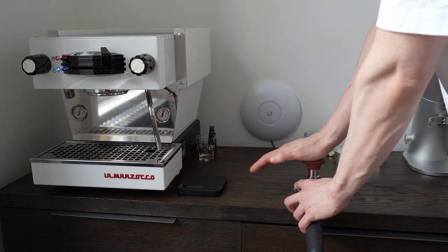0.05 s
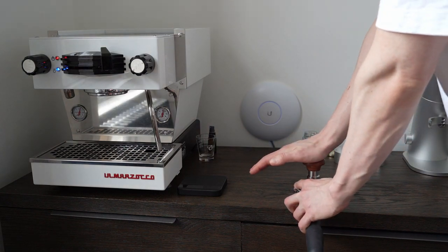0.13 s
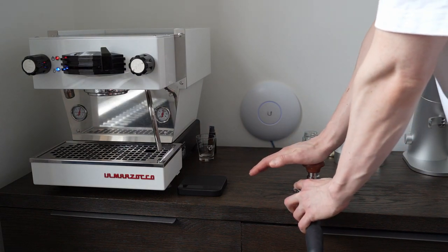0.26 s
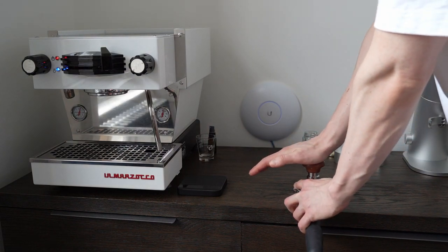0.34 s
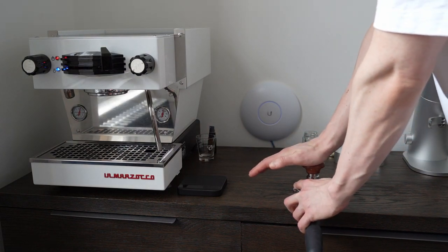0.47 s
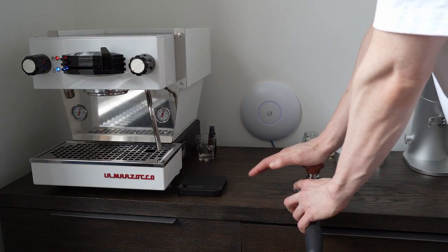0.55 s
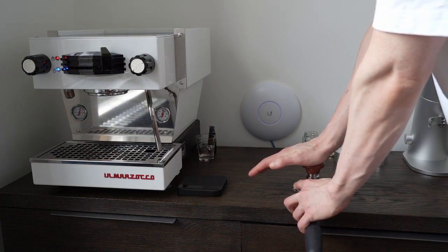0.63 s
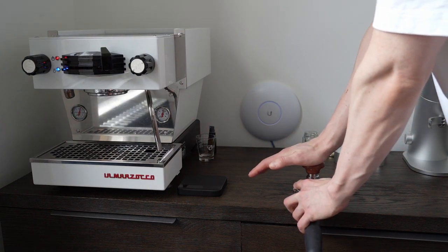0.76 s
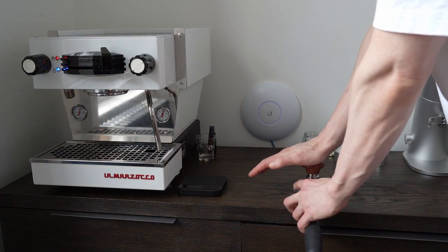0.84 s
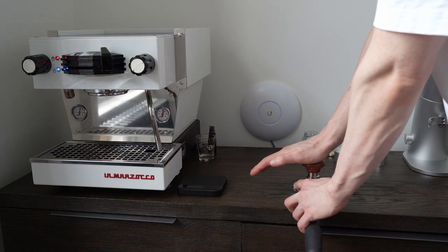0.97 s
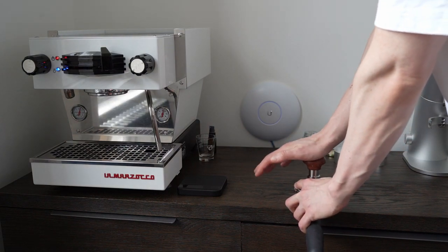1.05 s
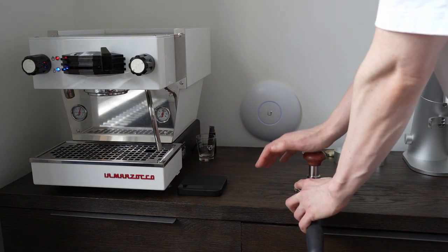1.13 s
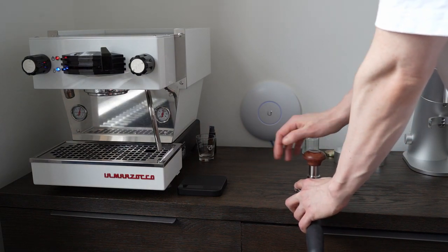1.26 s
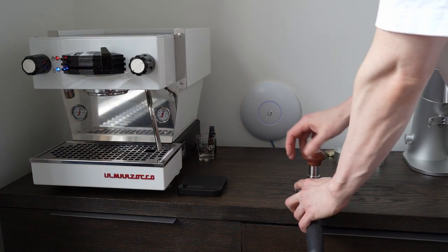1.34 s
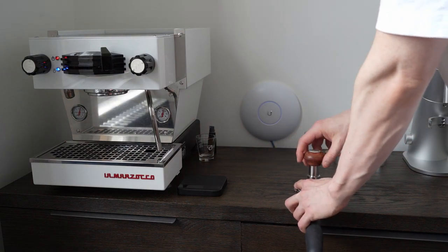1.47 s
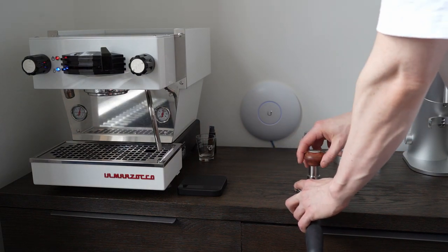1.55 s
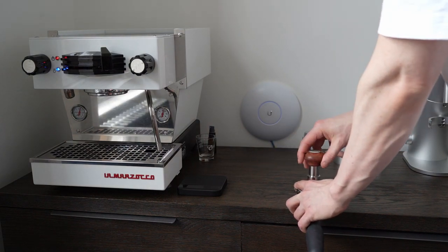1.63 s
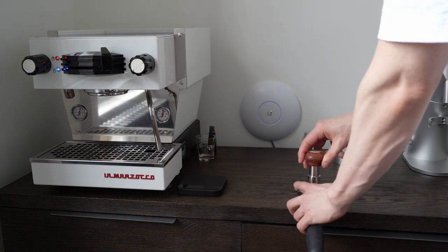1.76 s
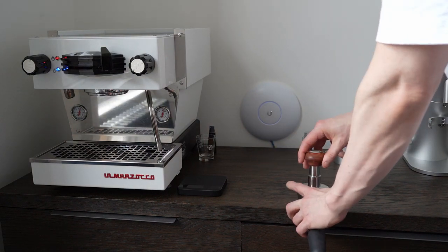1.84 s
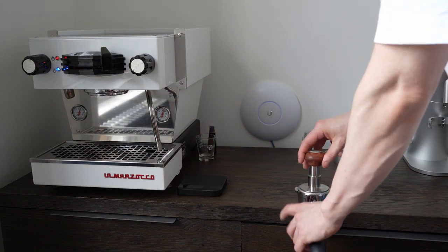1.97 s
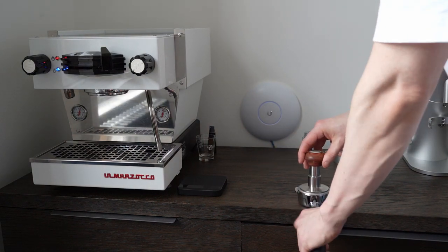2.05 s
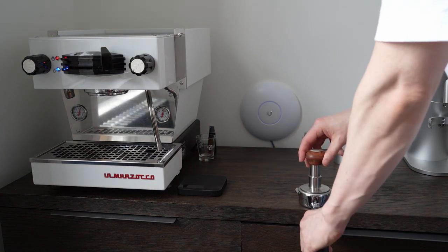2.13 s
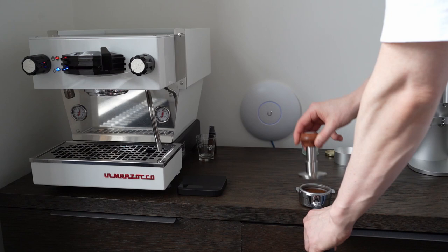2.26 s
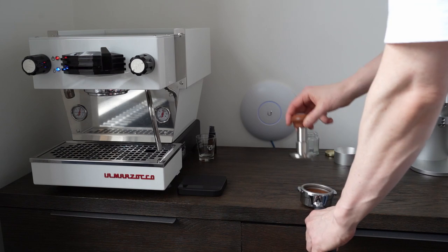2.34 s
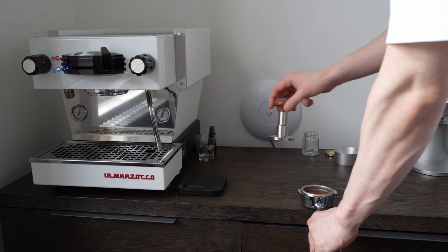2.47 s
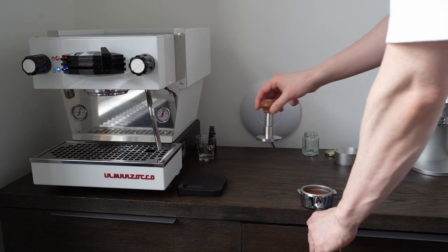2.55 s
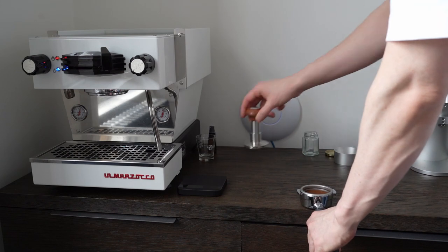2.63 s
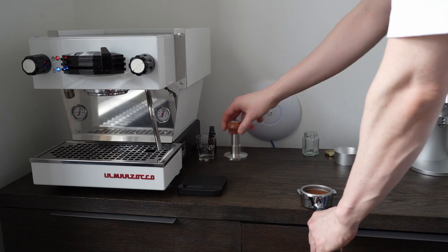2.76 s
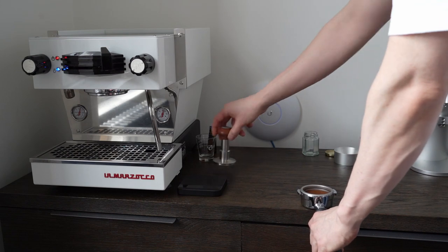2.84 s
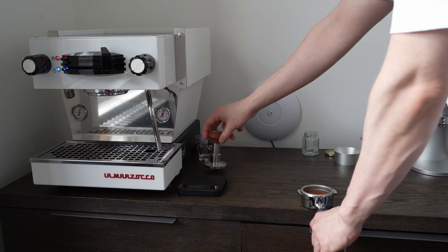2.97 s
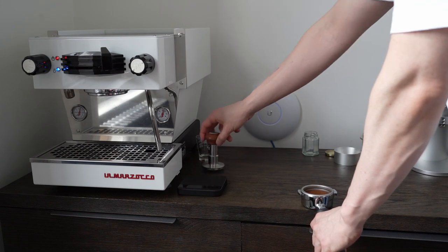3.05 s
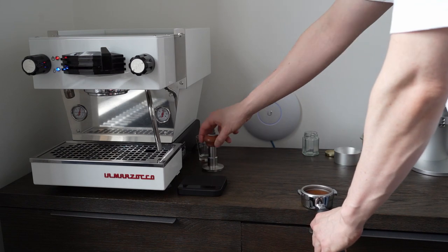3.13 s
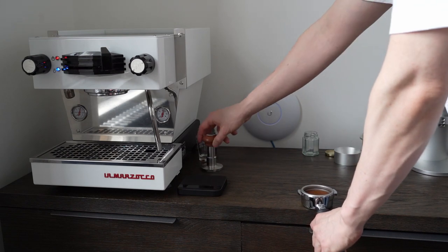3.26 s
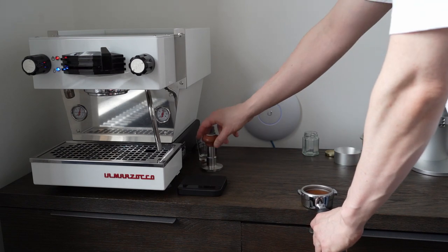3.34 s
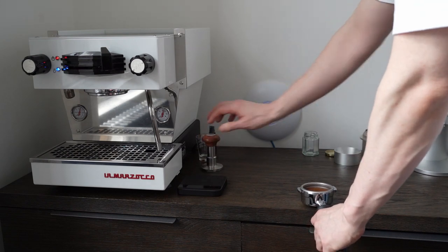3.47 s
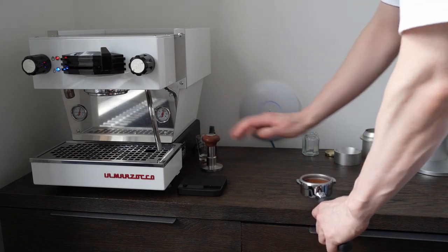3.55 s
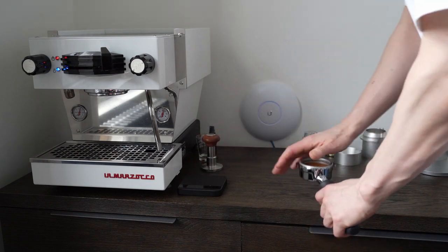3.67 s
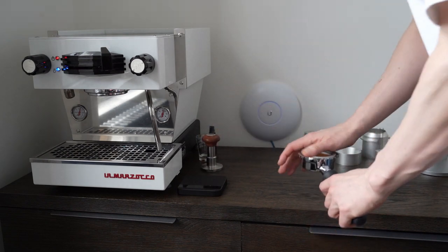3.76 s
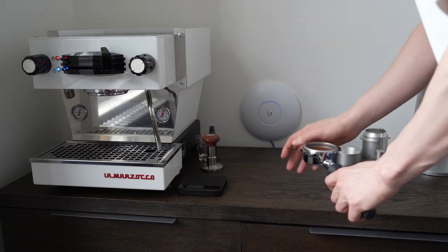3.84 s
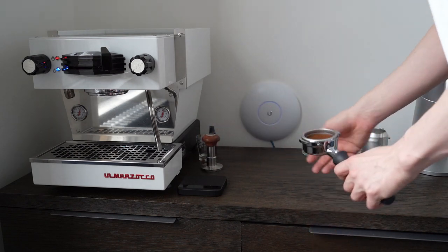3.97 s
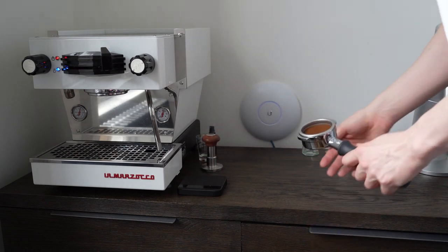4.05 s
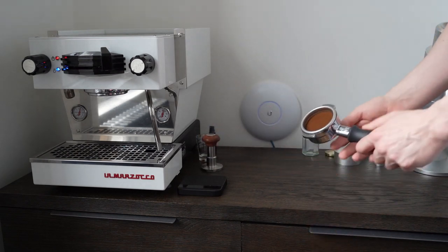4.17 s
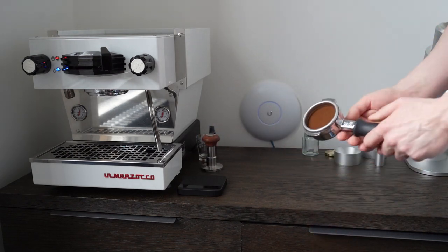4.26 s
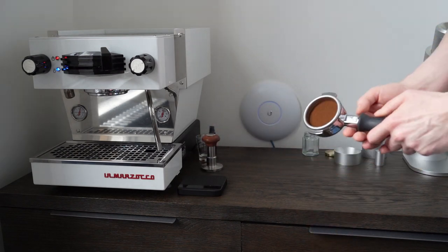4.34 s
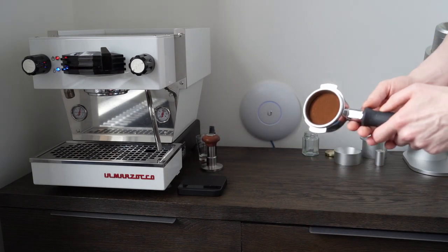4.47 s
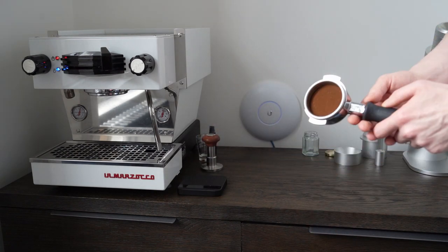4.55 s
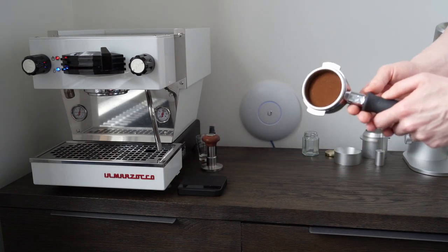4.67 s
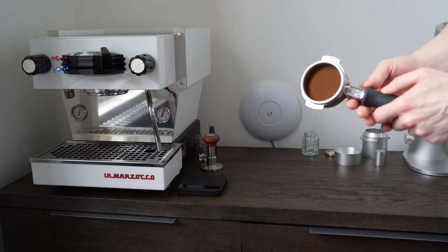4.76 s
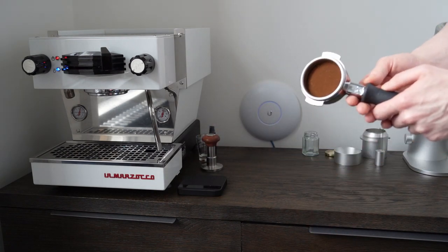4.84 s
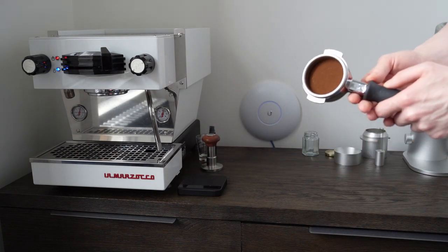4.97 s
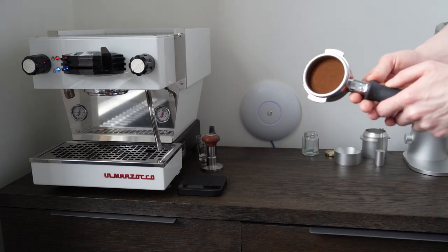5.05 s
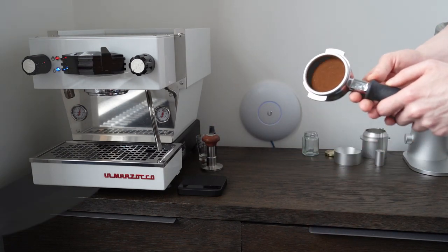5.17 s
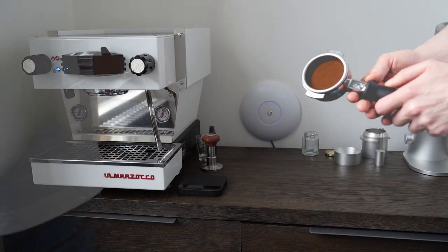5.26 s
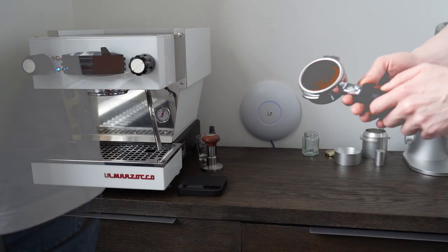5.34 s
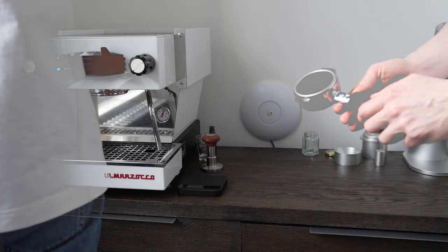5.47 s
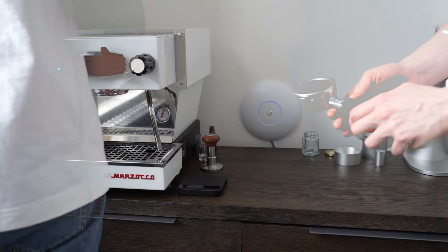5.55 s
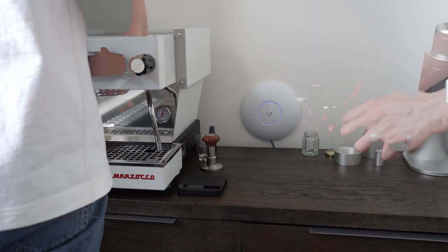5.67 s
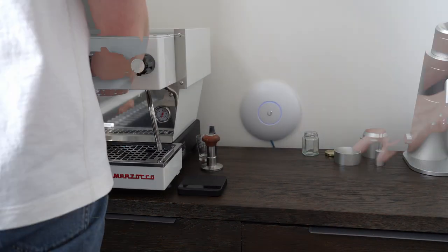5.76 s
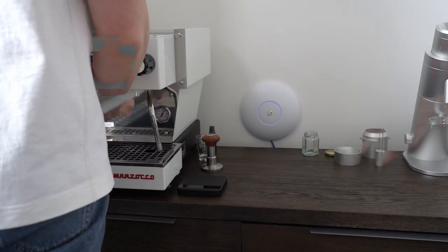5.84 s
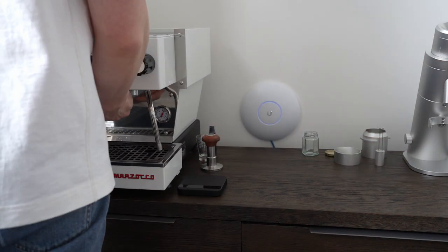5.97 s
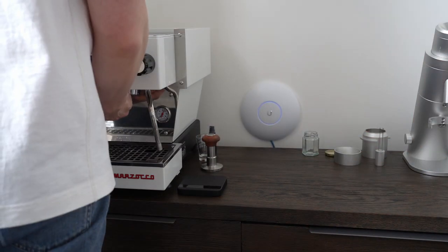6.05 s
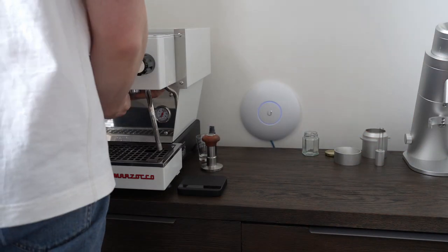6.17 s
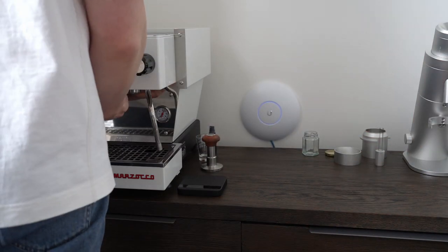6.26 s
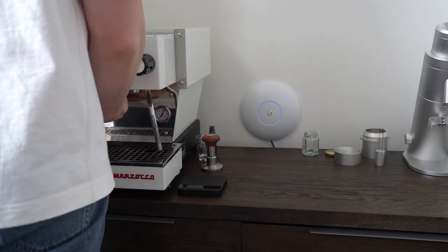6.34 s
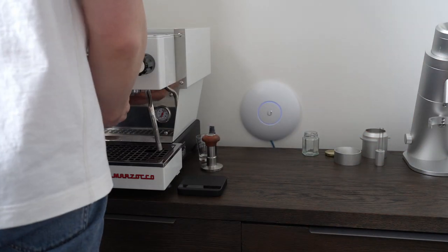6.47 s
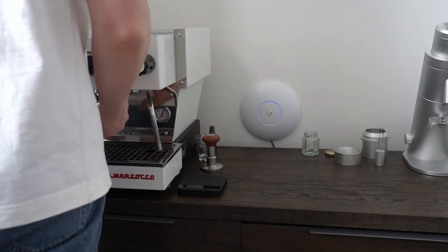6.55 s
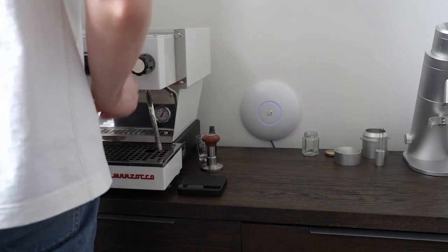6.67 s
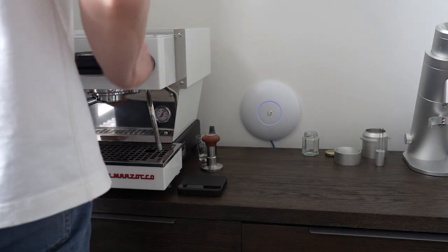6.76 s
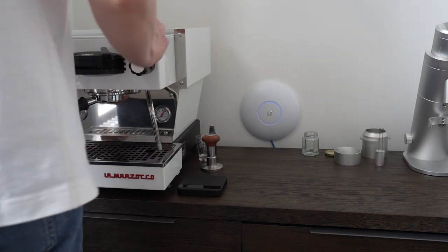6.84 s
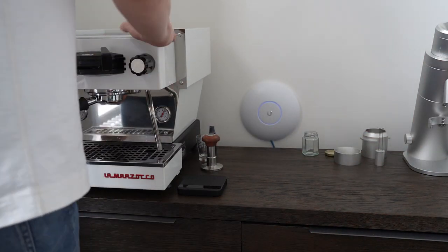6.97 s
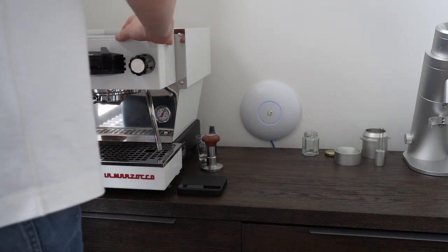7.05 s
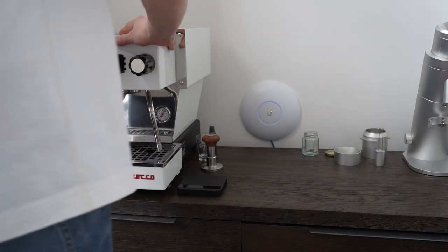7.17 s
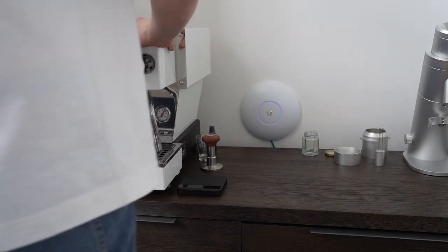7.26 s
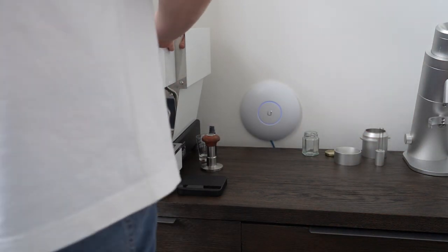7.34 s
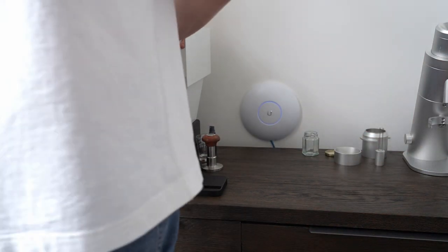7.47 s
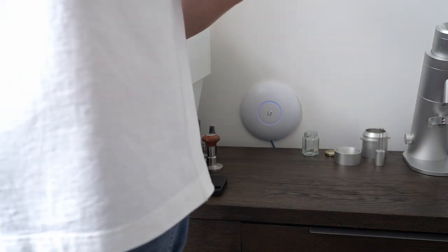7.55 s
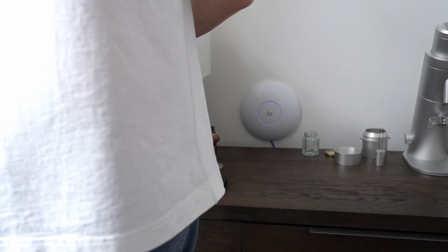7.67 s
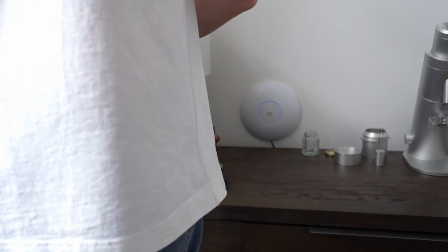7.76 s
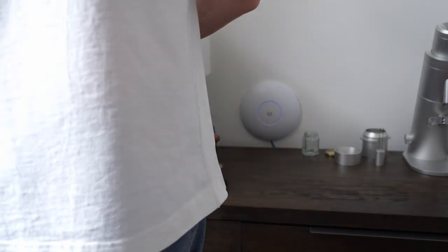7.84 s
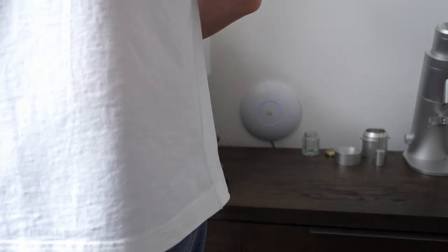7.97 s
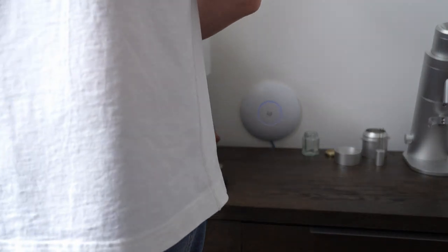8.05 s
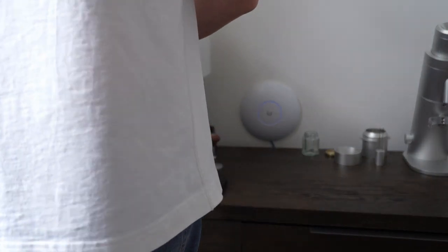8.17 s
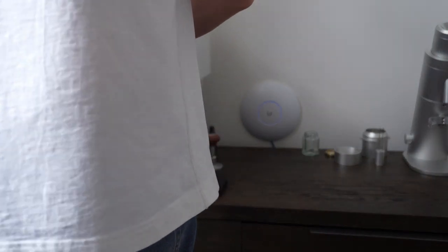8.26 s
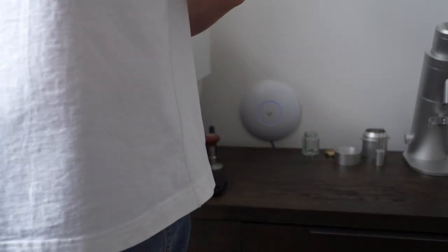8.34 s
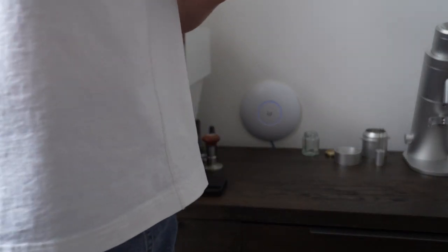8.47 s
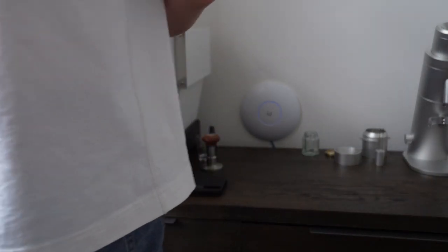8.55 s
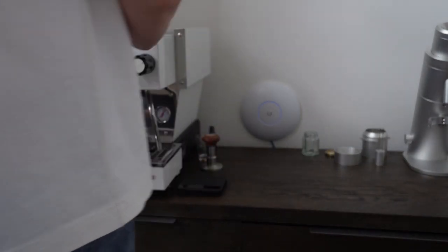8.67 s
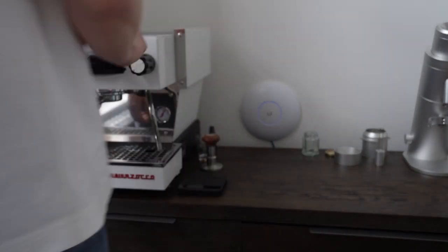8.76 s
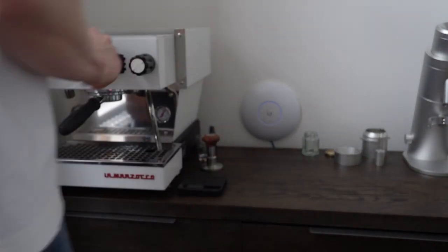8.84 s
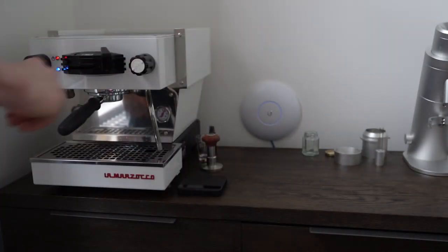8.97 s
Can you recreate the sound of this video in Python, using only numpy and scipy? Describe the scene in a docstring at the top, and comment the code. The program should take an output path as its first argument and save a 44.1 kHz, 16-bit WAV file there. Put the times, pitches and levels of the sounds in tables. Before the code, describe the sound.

A steel coffee filter handle squeals and scrapes across a hollow wooden counter, knocks hard, then later clanks into a metal machine in an echoey kitchen.

```python
"""A steel coffee filter handle is dragged over a hollow wooden counter, its base squealing, then knocked and
tamped as the top rocks. The tamper is set on its stand; the handle clanks into a machine, whose body hums low,
and a seat creaks. Hands and feet shuffle at times, over steady hum and hiss. Contacts are noise bursts, wood
and steel are decaying modes, friction is random catches. A large bare kitchen draws a long tail after the
drags, knocks and clanks; the soft low notes and floor booms stay dry."""
import sys
import numpy as np
from scipy import signal
from scipy.fft import rfft, irfft, next_fast_len
from scipy.io import wavfile
from scipy.ndimage import map_coordinates

SR = 44100
rng = np.random.default_rng(int(sys.argv[2]) if len(sys.argv) > 2 else 0)


def dump_mix(stems):
    """Bounce the given channels to the path in sys.argv[1] as a 16-bit WAV at rate SR."""
    frames = np.atleast_2d(stems).T  # one column per channel
    limited = np.clip(frames, -1, 1)  # hard clip at full scale
    pcm = np.round(limited * 32767).astype(np.int16)
    wavfile.write(sys.argv[1], SR, pcm)


N = 397341
TIME_S = np.arange(N) / SR

# Steady hum and hiss. Each row: frequency in Hz, relative level per Hz in dB.
FLOOR_SPECTRUM_DB = [(15, -32), (25, -5), (55, 0), (173, -3.5), (289, 1.5), (421, -10), (631, -6.5),
                     (741, -11), (997, -11.5), (2230, -18.5), (2920, -36), (3170, -22.5), (3930, -26.5),
                     (15500, -29.5)]
FLOOR_RMS_DB = -53.5
# Treble of the hiss sinks and returns. Each row: time in seconds, relative level in dB.
HISS_SWAY_DB = [(0, 6), (1.8, -4), (2.3, 1.5), (2.85, 2.5), (4.5, 2), (5.3, 0.5), (9, 1.5)]
HISS_FROM_HZ = 2000
# Likeness of the two channels. Each row: frequency in Hz, correlation from 0 to 1.
LIKENESS = [(40, .97), (125, .99), (250, .97), (500, .8), (1000, .55), (2000, .35), (5000, 0), (15000, 0)]
# Things dragged and feet shuffled on wood, one stroke a row. Each row: start, rise, hold and fall in seconds,
# then rumble, hollow, rasp and steel basket levels in dB.
DRAGS = [(0, 0.0018, 0.087, 0.14, -42.5, -34, -35.5, -40.5),
         (.09, 0.026, 0.13, 0.16, -44, -39.5, -36.5, -39.5),
         (.46, 0.014, 0.16, 0.36, -31.5, -26.5, -33, -32), (.92, 0.078, .03, 0.21, -50, -51, -47, -45),
         (1.07, .05, 0.038, 0.14, -47, -45.5, -41.5, -66),
         (1.595, 0.012, 0.016, 0.24, -41.5, -53, -57.5, -61),
         (2.1, 0.021, 0.016, .4, -34.5, -43.5, -43, -64), (2.165, 0.0068, 0.024, 0.072, -56, -68, -70, -36),
         (2.5, 0.063, 0.086, 0.32, -47, -58, -70, -78), (4.43, 0.071, 0.1, 0.18, -53.5, -51, -53.5, -60.5),
         (5.05, 0.057, 0.022, 0.19, -48.5, -51.5, -55.5, -75),
         (5.2, 0.016, 0.018, 0.084, -58, -62, -60, -63), (5.47, 0.01, 0.33, 0.11, -49, -56, -59, -51),
         (5.905, 0.008, .06, 0.19, -36, -35.5, -48, -47), (6.0, 0.045, 0.091, 0.34, -39, -41, -45, -40),
         (6.35, 0.031, 0.084, 0.39, -47.5, -45.5, -47.5, -45.5),
         (6.84, 0.11, 0.34, .15, -63, -62, -56, -55), (7.98, 0.045, 0.09, .3, -58, -71, -86, -89),
         (8.32, 0.0088, 0.013, 0.2, -60, -68, -53, -69), (8.6, 0.082, 0.3, .2, -57, -63, -62, -66)]
# Skin, cloth and coffee grit sliding. Each row: start, rise, hold and fall in seconds, hiss and top in dB.
SLIDES = [(0, .005, 0.091, .1, -73, -67), (.08, 0.011, .01, 0.097, -51, -46),
          (.15, 0.02, 0.037, 0.087, -66, -48), (.255, 0.0083, 0.0086, 0.05, -59, -51.5),
          (.458, 0.0057, 0.084, 0.15, -44, -32.5), (.93, 0.013, 0.0067, 0.019, -33, -34.5),
          (1.05, 0.048, 0.018, 0.053, -38, -44), (2.16, 0.026, 0.012, 0.091, -46, -34),
          (3.76, 0.036, 0.055, .15, -72, -62.5), (4.45, 0.04, 0.11, .4, -62, -72),
          (5.07, .02, 0.053, .2, -70, -79), (5.47, .02, 0.17, .25, -51.5, -62),
          (5.905, 0.0035, 0.042, 0.15, -41.5, -58), (6.95, 0.064, .13, .2, -38, -40.5),
          (8.33, .02, .15, .2, -60.5, -63.5), (8.45, 0.18, .12, 0.95, -58, -59)]
# Floorboards under shifting weight. Each row: start, rise, hold and fall in seconds, boom level in dB.
WEIGHT = [(.2, 0.083, .01, 0.17, -45), (.46, 0.012, 0.018, .25, -29), (.6, 0.026, .01, .2, -40),
          (1.12, 0.068, .02, 0.21, -44.5), (5.5, .05, .1, .3, -52.5), (5.84, 0.064, .05, 0.26, -43.5),
          (5.95, 0.18, .12, 0.28, -33.5), (6.38, 0.071, 0.23, 0.41, -48), (2.08, 0.014, 0.043, 0.18, -46),
          (4.46, 0.046, .1, 0.38, -62), (7.98, 0.062, 0.078, 0.34, -52), (8.7, 0.052, 0.071, 0.15, -55)]
FALL_DB = 30  # lost by a stroke in its fall length
# Grip on the basket, which favours some modes. Each row: time in seconds, favoured pitch in Hz.
GRIP_HZ = [(0, 2200), (.43, 2300), (.46, 1700), (1.04, 1700), (1.16, 3200), (1.6, 2000), (2.16, 1750),
           (2.25, 2050), (5.4, 2300), (5.95, 2700), (6.3, 2700), (6.5, 3300), (6.9, 2300), (9, 2300)]
GRIP_FALLOFF_DB_PER_OCTAVE = 20
# Dragged base singing on the varnish. Each row: time in seconds, pitch in Hz, level in dB.
SQUEAL = [(0, 420, -34), (.08, 445, -33), (.17, 460, -33), (.21, 505, -32), (.26, 545, -30), (.3, 545, -33),
          (.4, 535, -50), (.5, 535, -90)]
# Blows on the counter. Each row: time in seconds, crack, thud, wood ring and clack levels in dB,
# clack centre in Hz.
KNOCKS = [(0.0467, -66, -35.5, -35, -31, 970), (0.4559, -18.5, -18.5, -20, -17.5, 1470),
          (0.4905, -50, -19.5, -43, -13, 656), (0.5175, -40, -27, -26, -21, 1560),
          (0.5697, -37, -38, -15.5, -20, 654), (0.6291, -51, -39, -43, -27, 1606),
          (0.9433, -44, -43, -31, -25.5, 830), (0.9588, -38, -39, -43, -33, 740),
          (1.156, -23, -39, -37, -27, 1140), (1.1694, -47, -36, -50, -50, 1430),
          (1.6173, -78, -46.5, -53, -62, 1500), (2.107, -67, -32, -33, -37, 790),
          (2.569, -72, -35, -45, -43.5, 760), (3.1635, -32, -33, -32.5, -29.5, 1070),
          (5.0659, -69, -46, -75, -52, 810), (7.525, -37, -52, -51, -32, 1040),
          (8.325, -56, -40, -39.5, -45, 620), (8.526, -40, -54, -57, -44, 999)]
KNOCK_CRACK_S, KNOCK_CLACK_S = 0.0021, 0.0073  # decay constants
# Counter top rocking on its frame, and the machine body humming low near 250 Hz.
# Each row: time in seconds, level in dB, pitch in Hz.
LOW_NOTES = [(0.494, -12, 182.4), (0.571, -11.5, 191), (0.658, -27, 190), (0.73, -27, 202),
             (0.981, -34.5, 182), (1.19, -31.5, 178), (1.271, -35, 198), (1.652, -40, 184),
             (1.728, -42, 191), (1.825, -34.5, 185), (1.895, -39, 194), (2.139, -29.5, 177),
             (2.203, -37, 197), (2.252, -29, 187.4), (2.288, -34, 183), (2.4, -36, 194),
             (2.509, -31.5, 191), (2.593, -28, 189), (2.667, -28, 196), (2.739, -46, 192),
             (2.831, -45, 190), (3.182, -36, 151), (3.221, -36, 201), (3.277, -37, 173), (3.331, -49, 197),
             (5.651, -38, 248), (5.708, -36.5, 246), (5.774, -37, 247), (7.107, -48, 245),
             (7.158, -43, 216), (8.324, -41, 177)]
LOW_NOTE_S, LOW_NOTE_LEAD_S = 0.06, 0.01203  # note length; start ahead of the listed time
# Tamper touching steel. Each row: time in seconds, crack and ring levels in dB, favoured pitch in Hz.
CLINKS = [(1.085, -44, -30, 1420), (1.09, -46, -41, 3450), (1.128, -40, -36, 8000), (1.157, -34, -31, 2160),
          (2.165, -46, -36, 1800), (2.18, -36, -36, 2160), (2.183, -40, -44, 7000)]
# Tamper set on its stand. Each row: time in seconds, ring level in dB.
SET_DOWN = [(3.1632, -39)]
# Handle striking the machine's socket, one blow with its close echo (5.9943 s). Each row: time in seconds,
# crack, thud, ring and clack levels in dB, clack centre in Hz.
CLANKS = [(5.4561, -33, -43, -37.5, -30.5, 2550), (5.7858, -41, -45, -44, -37.5, 2700),
          (5.904, -27.5, -39, -32.5, -27.5, 1540), (5.9806, -18, -30.5, -35, -20.5, 2510),
          (5.9943, -49, -38.5, -41, -31, 2390), (6.0602, -26, -32.5, -28, -25, 2590),
          (6.2287, -50, -46, -32.5, -54, 930), (6.3683, -38, -43, -41, -30, 2360),
          (6.4161, -44, -47, -36, -38, 2740), (6.4724, -31, -52, -38, -25, 3460)]
CLANK_CRACK_S, CLANK_CLACK_S = 0.0072, 0.0094  # decay constants
# Gasket seat creaking as the handle turns. Each row: time in seconds, level in dB.
CREAKS = [(6.235, -43), (6.378, -45), (6.481, -45), (6.55, -49)]
CREAK_HZ = 880
# Modes of the resonant bodies. Each row: frequency in Hz, relative level in dB, 60 dB decay in seconds.
COUNTER_MODES = [(91.7, -8, 0.14), (136.4, -4.5, 0.16), (173.3, -3, 0.19), (195.8, -0.5, 0.13),
                 (260, -1.5, 0.053), (317, -5, 0.11), (349, -0.5, 0.041), (454, 3, 0.031),
                 (549, -3.5, 0.057), (660, -4, 0.015), (842, -11, 0.05), (954, -26, 0.02),
                 (1490, -17, 0.024)]
BASKET_MODES = [(1700, 1, .06), (2020, 0, .04), (2190, -4, .04), (2680, -3, .03), (3280, -6, .04)]
TAMPER_MODES = [(1421, 1, .05), (2159, -2, .3), (3025, -4, .12), (3500, 0, .15), (6525, 5, .3),
                (8720, -6, .15), (10880, 4, .15)]
STAND_MODES = [(5965, -8, .1), (9076, -6, .1), (13500, 0, .08)]
MACHINE_MODES = [(86, -3, .25), (250, -3, .1), (307, 0, .1), (479, 1, .09), (880, 0, .1), (1380, 2, .13),
                 (1674, -5, .04), (2132, -3, .04), (2500, 0, .04), (2800, 0, .04), (3300, -2, .04),
                 (3550, -1, .05), (3850, -3, .04)]
# Where the hands work, as the delay of the left channel. Each row: time in seconds, lag in samples.
LEFT_LAG_SAMPLES = [(0, 5), (4.9, 4.5), (5.4, -1.5), (7.3, -1), (8, -4.5), (9, 0.5)]
# Decay of the kitchen. Each row: frequency in Hz, 60 dB decay in seconds.
ROOM_T60_S = [(60, 0.38), (250, 0.98), (1000, 0.97), (3000, 1.007), (7000, 0.87), (15000, 0.11)]
# Colour of the kitchen. Each row: frequency in Hz, relative level in dB.
ROOM_COLOUR_DB = [(60, -10.5), (250, 3), (1000, 1.7), (4000, 0.5), (15000, 0)]
ROOM_DB, ROOM_RISE_S, EARLY_DB = -3, 0.0098, -13.5
CUTOFF_HZ = 16200


def from_db(db):
    """Decibels to gain."""
    return 10 ** (np.asarray(db) / 20)


def rms_one(x):
    """Scale to unit rms."""
    return x / np.sqrt(np.mean(x ** 2) + 1e-20)


def at_hz(points, hz):
    """Read a table on a log-frequency axis."""
    points_hz, values = np.transpose(points)
    return np.interp(np.log(hz), np.log(points_hz), values)


def band(x, low_hz, high_hz):
    """Band-pass."""
    edges_hz = [low_hz, min(high_hz, .45 * SR)]
    return signal.sosfilt(signal.butter(2, edges_hz, "band", fs=SR, output="sos"), x)


def strokes(table):
    """Every stroke swells, holds and dies away; one gain over time for each level column."""
    gains = 0
    for start_s, rise_s, hold_s, fall_s, *levels_db in table:
        t = TIME_S - start_s
        swell = np.clip(t / max(rise_s, .001), 0, 1) ** 2
        falls = np.clip((t - rise_s - hold_s) / max(fall_s, .01), 0, 5)
        gains = gains + np.outer(from_db(levels_db), swell * from_db(-FALL_DB * falls))
    return gains


def ring(force, hz, t60_s):
    """One mode as a two-pole resonator: a unit click sets a decaying sine of height 1 ringing."""
    r, w = from_db(-60 / (t60_s * SR)), 2 * np.pi * hz / SR
    return signal.lfilter([0, np.sin(w)], [1, -2 * r * np.cos(w), r * r], force + 1e-18)


def strike(times_s, low_db, high_db, modes, split_hz=450, spread_db=4.5, favoured_hz=None, falloff_db=0):
    """Blows ring each mode with random strength; above the split, modes off the favoured pitch get less."""
    at, out = np.round(times_s * SR).astype(int), np.zeros(N)
    chance_db = rng.normal(0, spread_db, (len(at), len(modes)))
    for k, (hz, db, t60_s) in enumerate(modes):
        octaves = 0 if favoured_hz is None else np.abs(np.log2(hz / favoured_hz))
        blow_db = low_db if hz < split_hz else high_db - falloff_db * octaves
        clicks = np.zeros(N)
        clicks[at] = from_db(blow_db + db + chance_db[:, k]) * (-1) ** k
        out += ring(clicks, hz, t60_s)
    return out


def cracks(times_s, levels_db, decay_s, low_hz):
    """The contact itself: a burst of bright noise that dies in milliseconds."""
    shape = np.zeros(N)
    for s, db in zip(times_s, levels_db):
        i = round(s * SR)
        shape[i:i + 4000] += from_db(db) * np.exp(-TIME_S[:4000] / decay_s)
    return shape * rms_one(band(rng.standard_normal(N), low_hz, SR / 2))


def clacks(times_s, levels_db, decay_s, centres_hz, width):
    """The dry body of a blow: a short noise burst around its own centre."""
    out, noise = np.zeros(N), rng.standard_normal((len(times_s), 4000))
    noise[:, 0] = 5  # the first touch is a sharp click
    for s, db, hz, burst in zip(times_s, levels_db, centres_hz, noise):
        i = round(s * SR)
        coloured = rms_one(band(burst, hz / width, hz * width))
        out[i:i + 4000] += from_db(db) * coloured * np.exp(-TIME_S[:4000] / decay_s)
    return out


def grit(per_s, spread_db):
    """Tiny random catches of one surface on another."""
    caught = rng.random(N) < per_s / SR
    strength = from_db(spread_db * np.minimum(rng.exponential(1, N), 4))
    return caught * strength * rng.choice([-1, 1], N)


def body(force, modes, low_hz, high_hz):
    """A stream of catches through those modes that lie between two limits; rms 1."""
    out = np.zeros(N)
    for k, (hz, db, t60_s) in enumerate(modes):
        if low_hz < hz < high_hz:
            out += from_db(db) * ring(force, hz, t60_s) * (-1) ** k
    return rms_one(out)


def stereo_bands(length, gain):
    """Half-octave noise bands, alike in both channels as the likeness table says; gain(hz) shapes each."""
    out, edges_hz = 0, 22 * 2 ** np.arange(0, 10, .5)
    white = rng.standard_normal((2, 2, length))
    for k, (low_hz, high_hz) in enumerate(zip(edges_hz, edges_hz[1:])):
        centre_hz = np.sqrt(low_hz * high_hz)
        mid, side = band(white[k % 2], low_hz, high_hz)
        alike = np.clip(at_hz(LIKENESS, centre_hz), -1, 1)
        pair = np.sqrt(1 + alike) * mid + np.sqrt(1 - alike) * side * [[1], [-1]]
        out = out + gain(centre_hz) * pair
    return out


def background():
    """Steady hum and hiss as shaped noise; its treble sways slowly."""
    sway_db = np.interp(TIME_S, *np.transpose(HISS_SWAY_DB))

    def gain(hz):
        return from_db(at_hz(FLOOR_SPECTRUM_DB, hz) + sway_db * (hz > HISS_FROM_HZ))

    return from_db(FLOOR_RMS_DB) * rms_one(stereo_bands(N, gain))


def gripped_basket(force):
    """A stream of catches through the basket's modes, weighted by the grip."""
    favoured_hz = np.interp(TIME_S, *np.transpose(GRIP_HZ))
    rings, power = 0, 0
    for hz, db, t60_s in BASKET_MODES:
        octaves = np.abs(np.log2(hz / favoured_hz))
        weight = from_db(db - GRIP_FALLOFF_DB_PER_OCTAVE * octaves)
        rings = rings + weight * rms_one(ring(force, hz, t60_s))
        power = power + weight ** 2
    return rings / np.sqrt(power)


def drags():
    """Catches of dragging ring the wooden top in three ranges, and the steel basket."""
    catches, chatter = grit(per_s=1100, spread_db=3.5), grit(per_s=500, spread_db=4.0)
    rumble = body(catches, COUNTER_MODES, 0, 225)
    hollow = body(catches, COUNTER_MODES, 225, 650)
    rasp = rms_one(body(chatter, COUNTER_MODES, 650, 2000) + 8.7 * rms_one(band(chatter, 617, 1560)))
    basket = rms_one(gripped_basket(chatter) + .6 * rms_one(band(chatter, 1400, 3000)))
    return np.sum(strokes(DRAGS) * [rumble, hollow, rasp, basket], axis=0)


def squeal():
    """Stick-slip tone with a few overtones and an unsteady grip."""
    s, hz, db = np.transpose(SQUEAL)
    phase = 2 * np.pi * np.cumsum(np.interp(TIME_S, s, hz)) / SR
    grip = 1 + 0.51 * rms_one(band(rng.standard_normal(N), 24, 63))
    tone = np.sin(phase) + from_db(-9) * np.sin(2 * phase) + from_db(-24) * np.sin(4 * phase)
    return tone * grip * from_db(np.interp(TIME_S, s, db))


def slides():
    """Fine dense grit: a hiss with a brighter top."""
    catches = grit(per_s=15000, spread_db=1.0)
    hiss = rms_one(band(catches, 2510, 6200))
    top = rms_one(band(catches, 5080, 10000)) + 1.05 * rms_one(band(catches, 11300, SR / 2))
    return np.sum(strokes(SLIDES) * [hiss, top], axis=0)


def knocks():
    """Blows ring the wooden top, each with a crack and a clack at the contact."""
    s, crack_db, thud_db, ring_db, clack_db, centre_hz = np.transpose(KNOCKS)
    out = strike(s, thud_db, ring_db, COUNTER_MODES, split_hz=400)
    out += cracks(s, crack_db, KNOCK_CRACK_S, low_hz=2920)
    out += clacks(s, clack_db, KNOCK_CLACK_S, centre_hz, width=2.24)
    return out


def floorboards():
    """Dull boom of narrow low noise, the same in both channels."""
    boom = band(band(rng.standard_normal(N), 65, 115), 65, 115)
    return rms_one(boom) * strokes(WEIGHT)[0]


def low_notes():
    """Counter top or machine body gives a soft low note that swells and fades within a few cycles."""
    out, t = np.zeros(N), TIME_S[:round(LOW_NOTE_S * SR)]
    swell = np.sin(np.pi * t / LOW_NOTE_S) ** 2
    for s, db, hz in LOW_NOTES:
        i = round((s - LOW_NOTE_LEAD_S) * SR)
        out[i:i + len(t)] += from_db(db) * swell * np.sin(2 * np.pi * hz * t)
    return out


def tamper():
    """Touches on steel ring the tamper's modes, mostly those near the favoured pitch."""
    s, crack_db, ring_db, favoured_hz = np.transpose(CLINKS)
    out = strike(s, ring_db, ring_db, TAMPER_MODES, spread_db=1, favoured_hz=favoured_hz, falloff_db=18)
    return out + cracks(s, crack_db, 0.0075, low_hz=2550)


def stand():
    """The stand rings in its high modes as the tamper is set down."""
    s, ring_db = np.transpose(SET_DOWN)
    return strike(s, ring_db, ring_db, STAND_MODES, spread_db=0)


def machine():
    """Clanks ring the machine's modes, each with a crack and a clack."""
    s, crack_db, thud_db, ring_db, clack_db, centre_hz = np.transpose(CLANKS)
    out = strike(s, thud_db, ring_db, MACHINE_MODES, split_hz=600, spread_db=3.0,
                 favoured_hz=centre_hz, falloff_db=11)
    out += cracks(s, crack_db, CLANK_CRACK_S, low_hz=4400)
    out += clacks(s, clack_db, CLANK_CLACK_S, centre_hz, width=1.5)
    return out


def creaks():
    """Slips of the seat that reach mostly one panel mode of the machine."""
    s, db = np.transpose(CREAKS)
    return strike(s, db, db, MACHINE_MODES, split_hz=0, spread_db=2.5, favoured_hz=CREAK_HZ, falloff_db=32)


def kitchen(x):
    """Close echoes off counter and wall; then reflections swell and each band dies at its own rate."""
    t = TIME_S[:round(1.5 * SR)]

    def gain(hz):
        return from_db(at_hz(ROOM_COLOUR_DB, hz) - 60 * t / at_hz(ROOM_T60_S, hz))

    tail = stereo_bands(len(t), gain) * (1 - np.exp(-t / ROOM_RISE_S))
    tail *= from_db(ROOM_DB) / np.sqrt(np.sum(tail ** 2) / 2)
    close = np.round(rng.uniform(.001, .016, 6) * SR).astype(int)
    tail[0, close] += from_db(EARLY_DB)
    tail[1, close + rng.integers(-6, 7, 6)] += from_db(EARLY_DB)
    size = next_fast_len(N + len(t))
    return irfft(rfft(x, size) * rfft(tail, size), size)[:, :N]


def scene():
    """Near sources and their room, then the dry low notes and booms, and the steady hum and hiss beneath."""
    near = drags() + squeal() + slides() + knocks() + tamper() + stand() + machine() + creaks()
    # the near sounds carry nothing below about 60 Hz
    near = signal.sosfilt(signal.butter(3, 60, "high", fs=SR, output="sos"), near)
    lag = np.interp(TIME_S, *np.transpose(LEFT_LAG_SAMPLES))
    left = map_coordinates(near, [np.arange(N) - lag], order=3)
    direct = np.array([left, near])
    return direct + kitchen(near) + floorboards() + low_notes() + background()


def record(dry):
    """The top is cut by a steep low-pass."""
    return signal.sosfilt(signal.cheby2(20, 60, CUTOFF_HZ, fs=SR, output="sos"), dry)


dry = scene()
out = record(dry)
dump_mix(out)
```